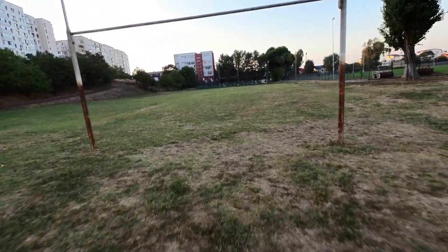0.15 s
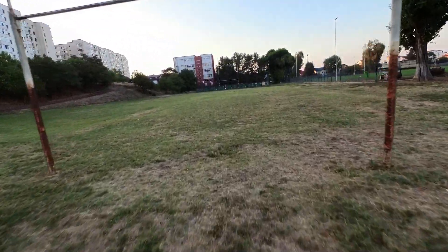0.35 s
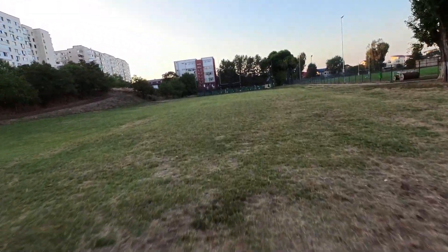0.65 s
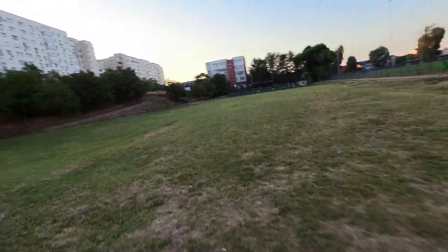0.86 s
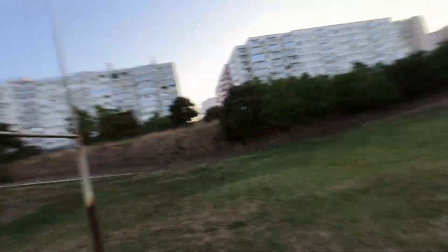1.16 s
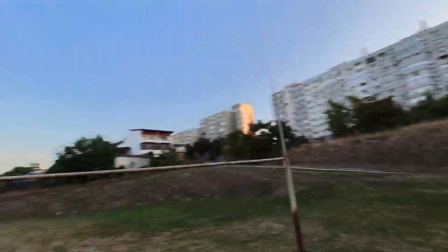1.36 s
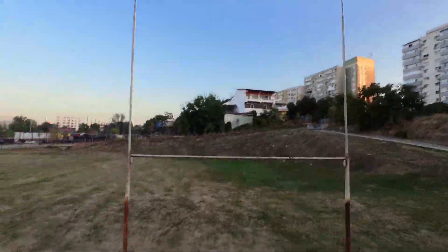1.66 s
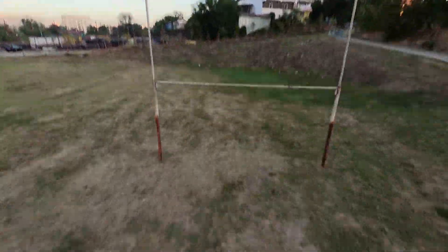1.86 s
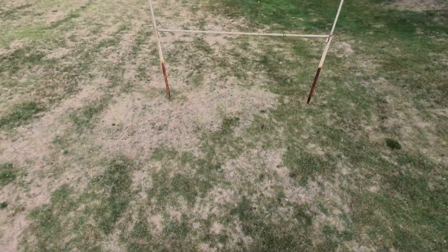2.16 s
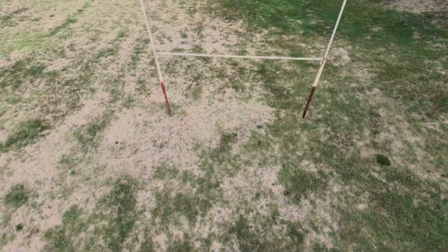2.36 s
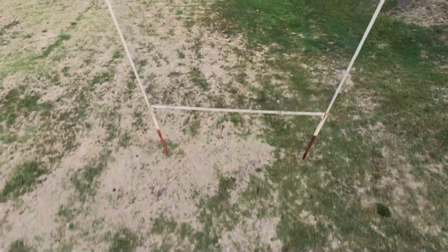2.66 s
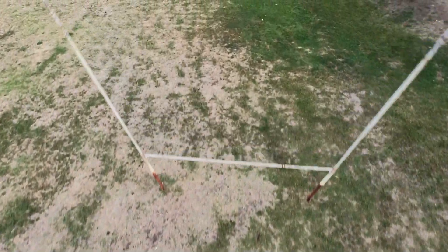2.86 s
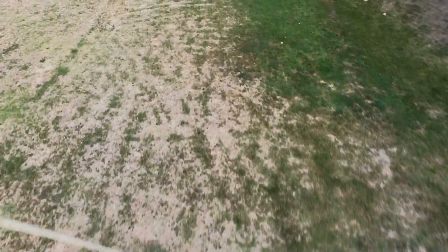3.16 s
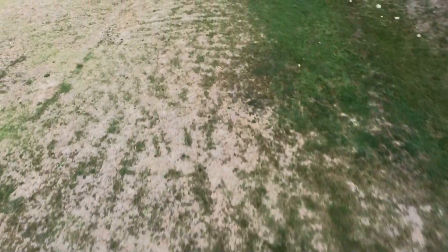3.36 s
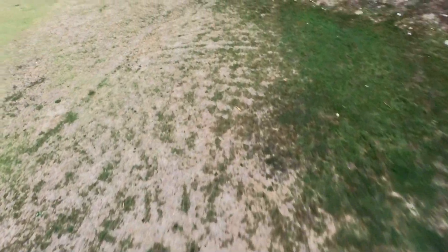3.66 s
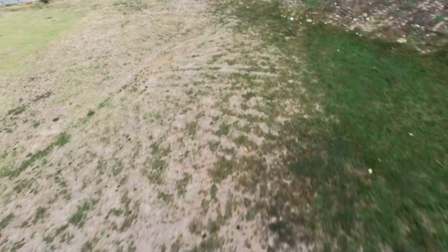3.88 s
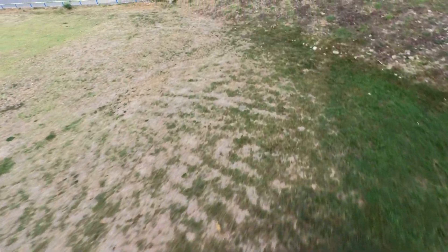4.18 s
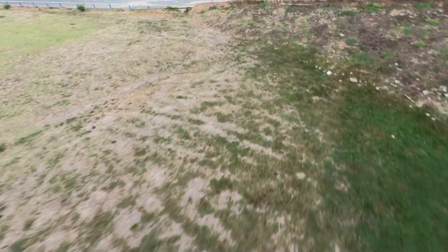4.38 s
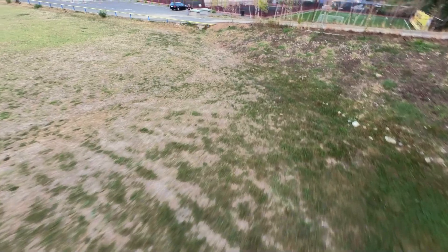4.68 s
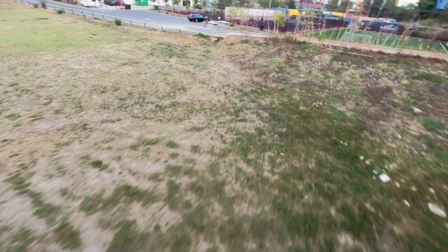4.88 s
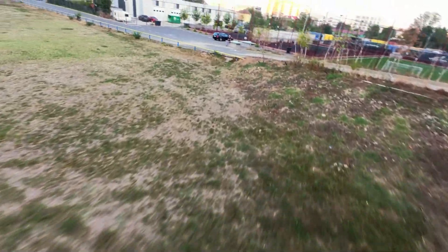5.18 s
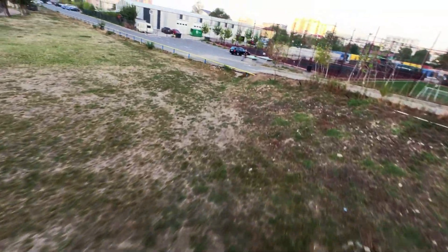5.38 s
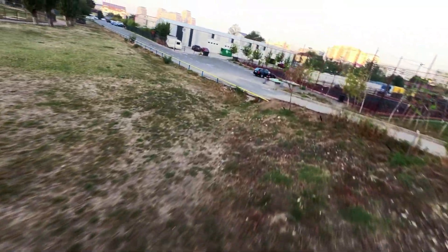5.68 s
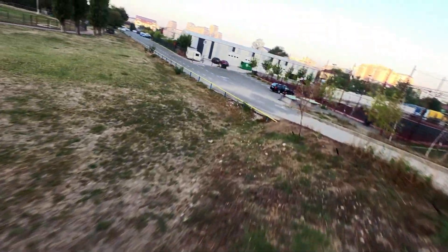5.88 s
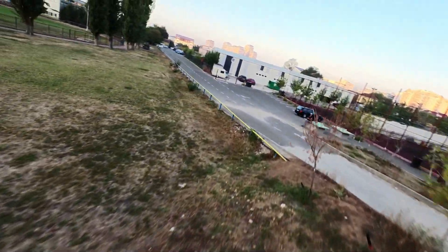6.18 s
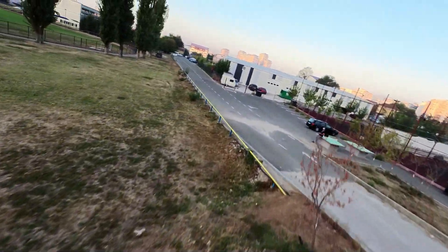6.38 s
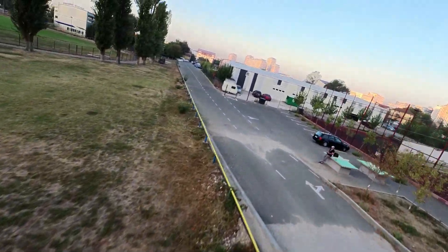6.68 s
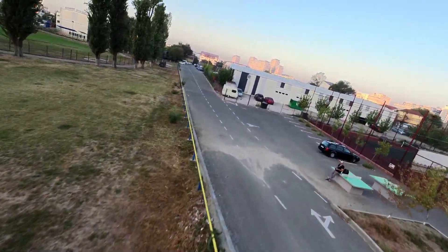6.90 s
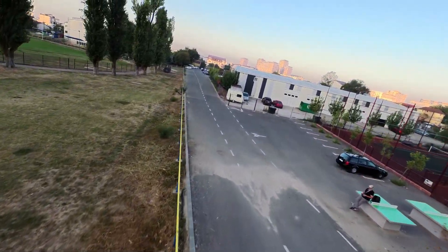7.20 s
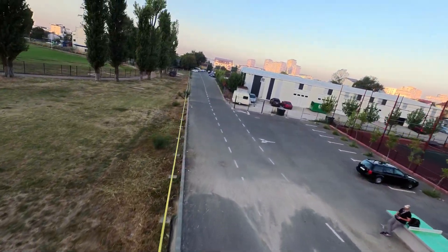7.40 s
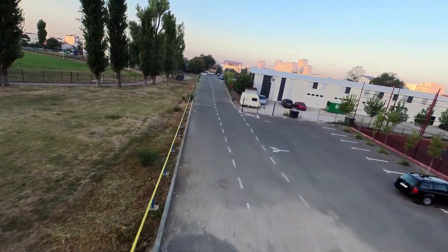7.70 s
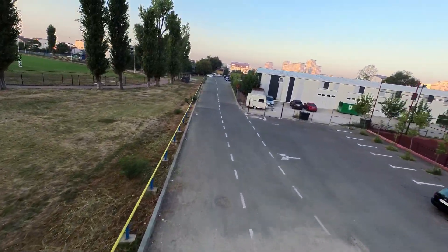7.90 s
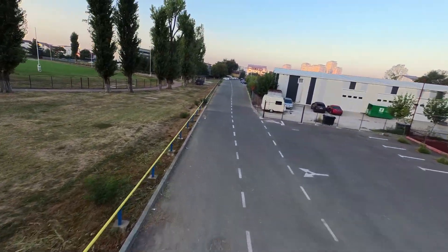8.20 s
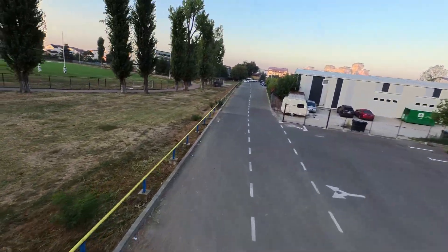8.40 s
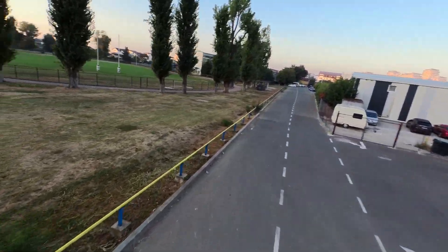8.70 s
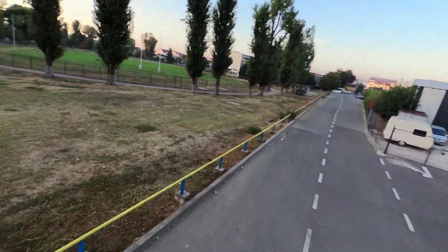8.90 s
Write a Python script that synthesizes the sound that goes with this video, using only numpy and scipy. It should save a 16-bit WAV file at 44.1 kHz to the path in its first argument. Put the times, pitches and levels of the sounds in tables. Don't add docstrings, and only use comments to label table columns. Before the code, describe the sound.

A small four-rotor drone with ducted propellers flies outdoors over a field, its microphone very close to the rotors. From 0 s a dense whine of four separate tones, roughly 1.5 to 2.3 kHz, beats and roughens over turbulent hiss and wind. Around 0.6-1.5 s the tones sag and spread as it turns, then surge at 1.7-2.8 s into a loud, piercing, slightly overloaded scream. At about 3 s pitch and hiss fall abruptly to a lower, thinner whirr; low wind buffets thump the microphone at 3.5-4 s. Throttle climbs to a strong, bright whine at 4.5-4.9 s, dips near 5.3 s, recovers and holds unsteadily with fuller wind. From 6.6 s it slides down, quieter and lower around 7-7.5 s with steady airflow, then rises gradually, hiss brightening until the cut at 9 s. Close, dry, continuous.

```python
import sys
import numpy as np
from scipy import signal
from scipy.io import wavfile
from scipy.ndimage import uniform_filter1d, map_coordinates

SR = 44100
rng = np.random.default_rng(int(sys.argv[2]) if len(sys.argv) > 2 else 0)


def how_loud(loudness_db):
    steps = np.asarray(loudness_db, float) / 20
    return 10 ** steps


def transcribe(signal):
    frames = np.atleast_2d(signal).T
    limited = np.clip(frames, -1, 1)
    pcm = np.round(limited * 32767).astype(np.int16)
    wavfile.write(sys.argv[1], SR, pcm)


N = 399105


def unit(x):
    return x / np.sqrt(np.mean(x ** 2) + 1e-20)


def curves(rows):
    s, *columns = np.transpose(rows)
    t = np.arange(N) / SR
    return [np.interp(t, s, column) for column in columns]


def peaks(rows):
    t = np.arange(N) / SR
    return sum(np.outer(sizes, np.clip(1 - np.abs(t - s) / half, 0, 1)) for s, half, *sizes in rows)


def wobble(rate):
    knots = rng.standard_normal(int(N * rate / SR) + 4)
    return map_coordinates(knots, [np.arange(N) * rate / SR])


def bumps(modes, hz):
    return sum(height / (1 + ((hz - centre) / width) ** 2) for centre, width, height in modes)


def shake_db(spells, fade_s=.12):
    t = np.arange(N) / SR
    gain = 0
    for start, length, db in spells:
        inside = np.minimum(t - start, start + length - t)
        gain = gain + how_loud(db) * np.clip(inside / fade_s, 0, 1)
    return 20 * np.log10(gain + 1e-4)


# (time [s], blade-passing tone [Hz])
THROTTLE = [(0, 2253), (2.78, 2394), (2.92, 2140), (3.2, 1407), (3.32, 1340), (3.72, 1551), (3.9, 1897),
            (4.27, 1990), (4.47, 2476), (4.87, 2454), (5.28, 1850), (5.45, 2162), (5.8, 2121), (6.52, 2297),
            (6.85, 1872), (7.45, 1631), (8.35, 2053), (9.05, 2330)]
# (time [s], speed over the throttle [Hz], blade loading [dB], unevenness that feeds the octave [dB])
STEER_A = [(0, -750, 1, 3), (.55, -655, -3, 13), (.8, -810, -6, 0), (1.1, -410, 2, -4),
           (1.25, -375, 8.5, 13), (1.77, 401, -2, 0), (1.9, 481.5, 0, 2), (2.1, 511, 1.5, -2),
           (2.28, 337, -0.5, 0), (2.78, 1, 0.5, -4), (2.92, 1, 5.5, 12.5), (3.3, 5, -7, 0), (3.9, 1, 1, -6),
           (7.45, 0, -8, -8), (7.85, 87, -1.5, -2), (8.35, 1.5, -2.5, -1), (8.55, 109.5, -3.5, 5),
           (8.95, -83, -4, -8)]
STEER_B = [(0, 50, -10, 0.5), (.55, -60, -6, 5), (.85, -410, -6, -1), (1.35, -562, 0.5, 10),
           (1.62, -229, 2.5, 8), (1.82, 246, 7, 3.5), (2.1, 300, 5.5, -6), (2.4, 58, 6, 16.5),
           (2.78, -118, 1.5, 11), (3.33, -290, 9, 8), (3.95, 140, -13, -1), (4.85, 180, -13, 0.5),
           (5.48, 317.5, -9.5, -0.5), (6.2, 209, -8.5, 1.5), (6.45, 59.5, -18, -14), (7.75, 860, -19, -14),
           (8.5, 191, -8, -4), (9.05, 6.5, -12, 3)]
STEER_C = [(0, -60, -10, -2), (0.551, -130, -13, -4), (0.801, -350, -0.5, 2), (1.3, -496, -4, 0),
           (1.571, -660, -7, -1), (1.75, -246, 2.5, 8), (1.95, -232, 1.5, 4), (2.42, 69, -2, -12),
           (2.8, -30, -4.5, 0), (3.2, -120, 8.5, 13.5), (3.401, -250, 7, 16), (3.75, -285, 5, 12),
           (4.08, -369, 3, 11), (4.25, -450, 4, 13.5), (4.48, -687, 3.5, 1), (6.5, -711, -2, 15),
           (6.75, -520, -4, 0), (9.05, -560, -3, 0)]
# (time [s], speed over the throttle [Hz], blade loading [dB])
STEER_D = [(0, -600, -6), (0.449, -552, -4), (0.899, -912, 2), (1.5, -831, -16), (1.67, -698, -2),
           (1.8, -483, 7), (2.18, -313, 0), (2.45, -63, 1), (2.75, -142, -4.5), (3.301, -330, 2),
           (4.6, -500, -18.5), (5.35, -340, 1), (5.9, -350, 0), (6.4, -494, -4.5), (6.7, -382, -0.5),
           (7.2, -500, -18), (8.6, -330, -32), (9.05, -435, -3)]
# (time [s], half length [s], speed [Hz], loading [dB], unevenness [dB])
FLICKS_A = [(1.17, 0.11, 26, 4.5, 7), (1.4, .1, 1, -2.5, -10), (1.49, 0.089, 165, 0.5, -8),
            (1.57, 0.099, -176, -9, -15), (4.0, .2, 25.5, -0.5, 0), (4.62, 0.27, 35, 1, 11),
            (5.02, .15, 15, 3.5, 0), (5.9, 0.77, 1, 7, 1.5), (6.37, .15, -130, 6, 6), (6.6, .2, 1, 5.5, 5),
            (7.65, .1, 5.5, 7, 2), (9.06, 0.099, 128, 4, 0)]
FLICKS_B = [(1.55, 0.09, 1, 1, 6), (1.711, .1, 74, 1.5, -5), (1.95, .17, 30, 0.5, 2),
            (2.29, .13, -30, -0.5, 5), (2.55, .15, 25, 0.5, 0), (2.85, .07, 1, -10, 4),
            (2.98, .15, 0.5, 3, 1), (4.2, .2, 10, 7, 4), (4.42, .12, -19.5, -14.5, -4),
            (5.27, .18, 30, 1, 8.5), (7.25, .4, -60.5, -13, -8), (8.249, .25, -100, -12, -10)]
FLICKS_C = [
    (1.4, .15, 360, 0, 12),
    (2.3, 0.095, -11.5, 4, 4),
    (3.05, .12, 1, 2.5, 1),
    (3.9, .15, -38, 0, 0),
    (5.15, .35, 151, 4, 0),
    (6.95, 0.21, -230, 2, -1),
    (7.5, .5, 200, -13, 0),
]
FLICKS_D = [
    (2.551, 0.147, 20, 0, 0),
]
# (start [s], length [s], level [dB])
SHAFT = [
    [(-.1, 0.89, -40), (.85, 2.27, -44.5)],
    [(1.7, 0.74, -39.5)],
    [(2.7, 0.5, -41), (3.9, 0.498, -43), (8.4, .8, -39)],
    [],
]
# (frequency [Hz], level [dB])
TONE = [(1000, -44.5), (1400, -41.5), (1700, -32), (1900, -31), (2100, -23), (2250, -20), (2500, -18.5),
        (2900, -20)]
# (frequency [Hz], level [dB])
OCTAVE = [(3000, -54), (3700, -49), (4200, -38), (4500, -32.5), (4900, -30.5), (5300, -32.5), (5700, -46)]
# (centre [Hz], width [Hz], level [dB])
DUCT = [(7930, 330, -18), (10900, 700, -28)]


def rotor(steering, flicks, spells):
    blades, hunt, flutter_db, smear_rad, hump_db = 5, .0025, 1.56, 0.38, -15
    trim_hz, load_db, *uneven_db = curves(steering)
    flick_hz, flick_db, flick_uneven_db = peaks(flicks)
    hz = uniform_filter1d(curves(THROTTLE)[0] + trim_hz + flick_hz, size=1800)
    phase = 2 * np.pi * np.cumsum(hz * (1 + hunt * wobble(18))) / SR

    tone_db = np.interp(hz, *np.transpose(TONE)) + load_db + flick_db
    orders = [(1, how_loud(tone_db))]
    for db in uneven_db:
        octave_db = np.interp(2 * hz, *np.transpose(OCTAVE)) + db + flick_uneven_db + 1.2 * wobble(5.9)
        orders.append((2, how_loud(octave_db)))
    orders.append((1 / blades, how_loud(shake_db(spells))))
    for k, (centre, width, db) in enumerate(DUCT, 3):
        orders.append((k, how_loud(tone_db + db) * bumps([(centre, width, 1)], k * hz) ** 2))

    lines = 0
    for k, gain in orders:
        flutter = how_loud(flutter_db * wobble(45))
        lines = lines + gain * flutter * np.sin(k * phase + smear_rad * np.sqrt(k) * wobble(120))
    hump = how_loud(tone_db + hump_db) * wobble(500) * np.sin(2 * phase)
    return np.sqrt(2) * (lines + hump)


# (time [s], level [dB])
THRUST = [(0.0, -28), (0.6, -30), (0.66, -33), (1.34, -28), (1.39, -26.5), (1.84, -24.5), (2.92, -31),
          (3.25, -44), (3.35, -45.5), (3.91, -32.5), (4.26, -31.5), (4.46, -26), (4.91, -25.5),
          (5.27, -30.5), (5.39, -26.5), (6.58, -27.5), (7.08, -37), (9.05, -26)]
# (time [s], level [dB])
AIRSPEED = [(0, -37), (.6, -36), (1, -38), (1.8, -35.5), (2.7, -39), (3, -41), (3.2, -41), (3.45, -36),
            (3.85, -36), (4.15, -31.5), (4.6, -26.5), (6, -28.5), (6.6, -31), (7, -35.5), (8, -35),
            (8.45, -33), (8.8, -31.5), (9.05, -32)]


def effort():
    cruise_thrust_db, cruise_air_db = -29, -34
    thrust_db = uniform_filter1d(curves(THRUST)[0], size=5000) - cruise_thrust_db
    return thrust_db, curves(AIRSPEED)[0] - cruise_air_db


# (centre [Hz], width [Hz], level [dB])
FRAME = [(1095, 29, 8.5), (1470, 60, 2.5), (1834, 90, 2), (2400, 63, 2), (2600, 60, 2), (4796, 160, 7),
         (10360, 110, 5)]


def rush(spectrum, patchy_db):
    hz, _, z = signal.stft(rng.standard_normal(N + 2048), SR, nperseg=2048)
    patches = uniform_filter1d(rng.standard_normal(z.shape), 24, 0)
    patches = unit(uniform_filter1d(patches, 3, 1))
    f, level = np.transpose(spectrum)
    colour_db = np.interp(np.log(hz + 1), np.log(f), level, left=-120, right=-120) + bumps(FRAME, hz)
    coloured = z * how_loud(colour_db[:, None] + patchy_db * patches)
    return unit(signal.istft(coloured, SR, nperseg=2048)[1][:N])


# (frequency [Hz], density [dB per Hz])
BODY = [(700, -41), (1000, -18), (1300, -13.5), (2200, -3), (3000, -9), (3300, -10), (3600, -25.5)]
GAP = [(3000, -30), (3350, -2), (3700, -0.5), (4100, 2.5), (4500, -20.5)]
WHISTLE = [(3600, -30.5), (4200, -11), (5600, -9.5), (5800, -15), (6800, -12.5), (7100, -29.5), (7600, -50)]
FIZZ = [(6500, -42), (7200, -5.5), (8500, 1), (10300, -2.5), (12000, -4), (13200, -2), (14000, -9),
        (15000, -5.5), (15900, -4)]


def wash():
    thrust_db, air_db = effort()
    gust = wobble(28)
    body_db = -23.5 + 0.33 * thrust_db + 0.19 * air_db + 0.21 * gust
    gap_db = -32 + 0.62 * thrust_db + 0.34 * air_db + 0.37 * gust
    whistle_db = -23.0 + 0.63 * thrust_db + 0.1 * air_db + 0.28 * gust
    fizz_db = thrust_db - 26.5 + 0.4 * gust + 0.85 * wobble(36)
    body = how_loud(body_db) * rush(BODY, patchy_db=1)
    gap = how_loud(gap_db) * rush(GAP, patchy_db=3.0)
    whistle = how_loud(whistle_db) * rush(WHISTLE, patchy_db=1.5)
    fizz = how_loud(fizz_db) * rush(FIZZ, patchy_db=1.58)
    return body + gap + whistle + fizz


# (frequency [Hz], density [dB per Hz])
BUFFET = [(10, -30), (22, -7), (45, 4), (100, -1.5), (200, -25), (400, -54)]
ROAR = [(50, -24), (110, -0.5), (200, -1.5), (360, -3.5), (550, -7), (900, -42)]
FLOW = [(300, -5), (500, -4), (700, 3.5), (1000, 0.5), (1300, -3), (1700, -45)]
# (time [s], half length [s], extra buffeting [dB], extra flow [dB])
GUSTS = [
    (.1, 0.61, 2, 0.5),
    (3.1, 0.26, -3, 1),
    (3.5, 0.27, 9.5, -1.5),
    (4.0, 0.28, 15.5, -2),
    (7.5, 1.13, 0, 6),
    (8.8, 0.33, 3, 0.5),
]


def wind():
    thrust_db, air_db = effort()
    gust_buffet_db, gust_flow_db = peaks(GUSTS)
    lumps = 0.9 * wobble(8.2)
    buffet_db = -39.5 + 0.43 * air_db + gust_buffet_db + lumps + 1.4 * wobble(4)
    roar_db = air_db - 34 + 0.82 * lumps
    flow_db = -35 + gust_flow_db + .4 * air_db + 0.18 * thrust_db + 0.77 * lumps
    buffet = how_loud(buffet_db) * rush(BUFFET, patchy_db=-2.5)
    roar = how_loud(roar_db) * rush(ROAR, patchy_db=1.0)
    flow = how_loud(flow_db) * rush(FLOW, patchy_db=1)
    return buffet + roar + flow


def scene():
    steering = (STEER_A, STEER_B, STEER_C, STEER_D)
    flicks = (FLICKS_A, FLICKS_B, FLICKS_C, FLICKS_D)
    whine = sum(map(rotor, steering, flicks, SHAFT))
    return np.tile(whine + wash() + wind(), (2, 1))


def overload(x):
    swing = signal.sosfiltfilt(signal.butter(4, 3600, fs=SR, output="sos"), x)
    load = signal.sosfiltfilt(signal.butter(2, 350, fs=SR, output="sos"), 2 * swing ** 2)
    jump = 4.4 * np.clip(load * how_loud(2.8 * wobble(200)), 0, .42) ** 3.4
    jump = signal.lfilter([.03], [1, -.97], jump)
    x = x + jump - uniform_filter1d(jump, size=2500)
    return x / (1 + np.abs(x / .95) ** 6) ** (1 / 6)


# (lower edge [Hz], share [0-1])
KEPT = [(3000, .35), (3600, .4), (4200, .6), (4900, .6), (5500, .7), (5900, .3), (6400, .6), (6900, .08),
        (7700, .1), (8400, .25), (9000, .08), (10000, .12), (11000, .08), (12900, .45), (13800, .08),
        (14800, .08), (15850, 0)]


def noise_fill(x, tonal_db=10.5, apart=.8):
    hz, _, z = signal.stft(x, SR, nperseg=2048)
    fresh = signal.stft(rng.standard_normal((3, N)), SR, nperseg=2048)[2]
    fresh = np.sqrt(1 - apart) * fresh[0] + np.sqrt(apart) * fresh[1:]
    dice = uniform_filter1d(rng.standard_normal((len(KEPT), z.shape[2])), size=3, axis=1)
    out = z * (hz < KEPT[-1][0])[:, None]
    for (lo, kept), (hi, _), luck in zip(KEPT, KEPT[1:], dice):
        band = (hz >= lo) & (hz < hi)
        power = np.abs(z[0, band]) ** 2
        noisy = power.max(0) < how_loud(tonal_db) ** 2 * np.median(power, axis=0)
        swap = noisy & (luck > np.quantile(luck, kept))
        fresh_power = np.mean(np.abs(fresh[:, band]) ** 2, axis=(0, 1))
        fill = fresh[:, band] * np.sqrt(power.mean(0) / fresh_power)
        out[:, band] = np.where(swap, fill, z[:, band])
    return signal.istft(out, SR, nperseg=2048)[1][:, :N]


def low_pass(x):
    return signal.sosfilt(signal.butter(12, 16890, fs=SR, output="sos"), x)


def record(dry):
    filled = noise_fill(overload(dry))
    mix = filled / (1 + np.abs(filled / .94) ** 12) ** (1 / 12)
    return low_pass(mix)


dry = scene()
out = record(dry)
transcribe(out)
```